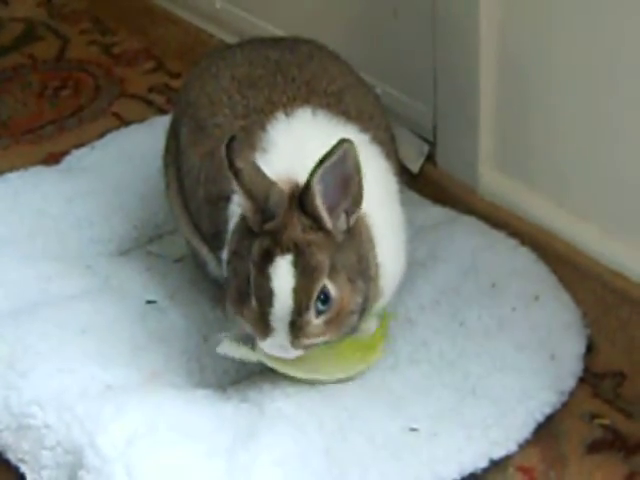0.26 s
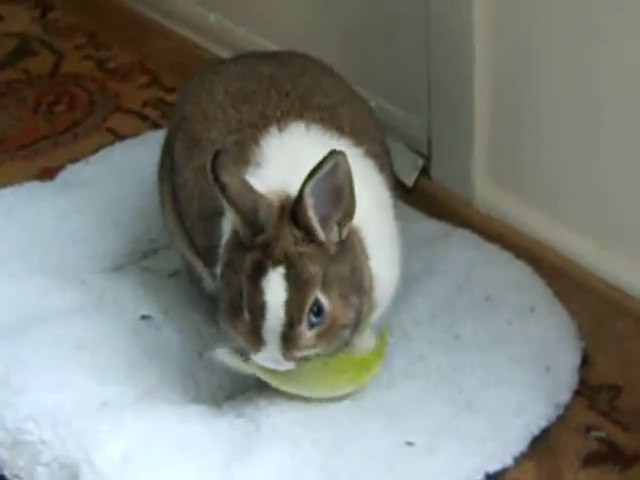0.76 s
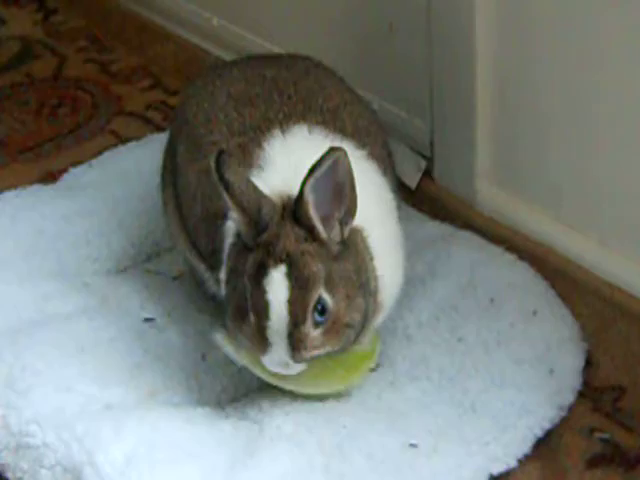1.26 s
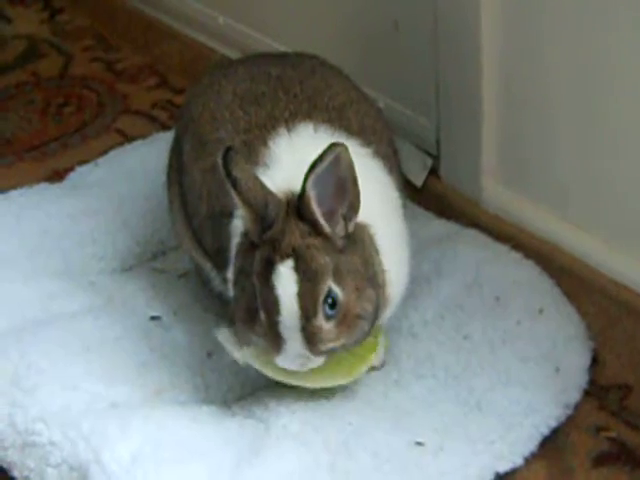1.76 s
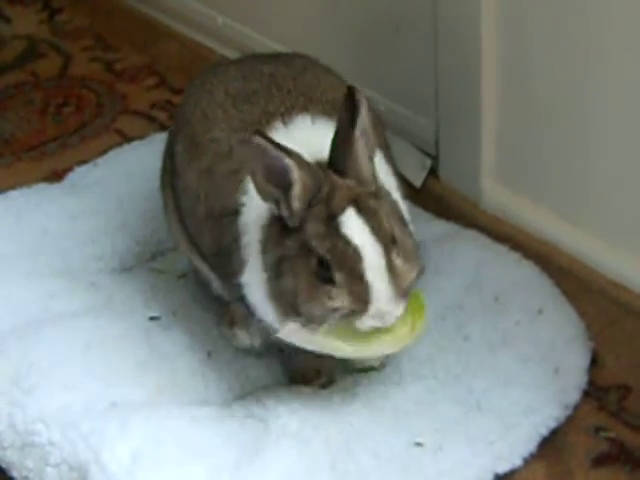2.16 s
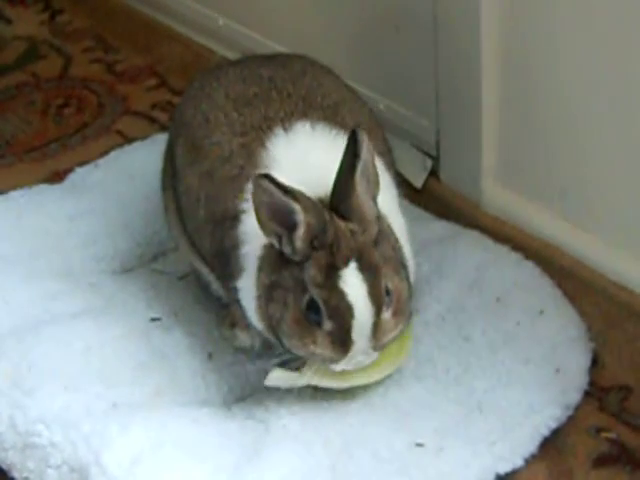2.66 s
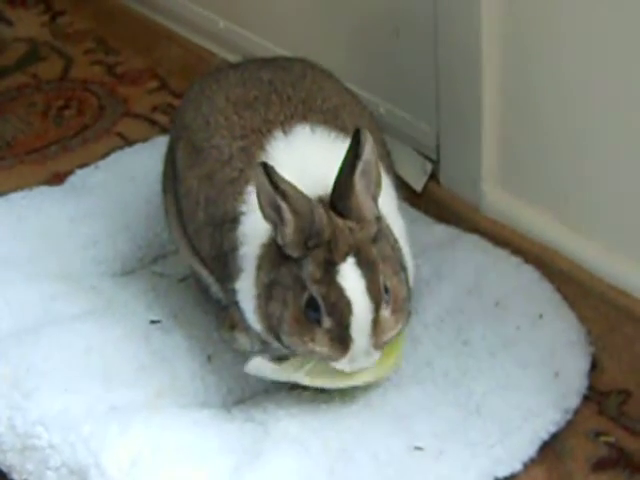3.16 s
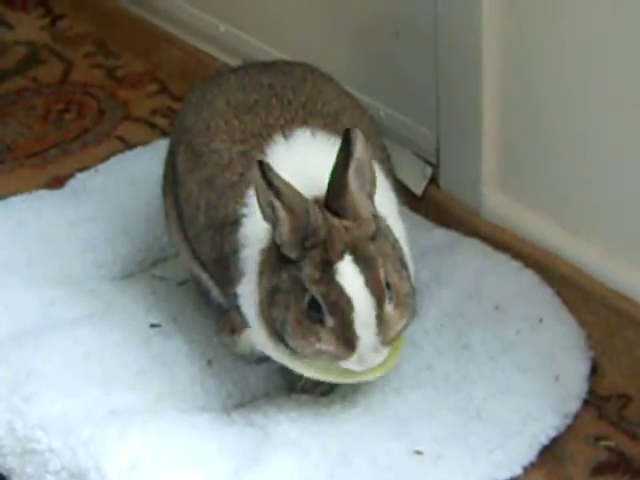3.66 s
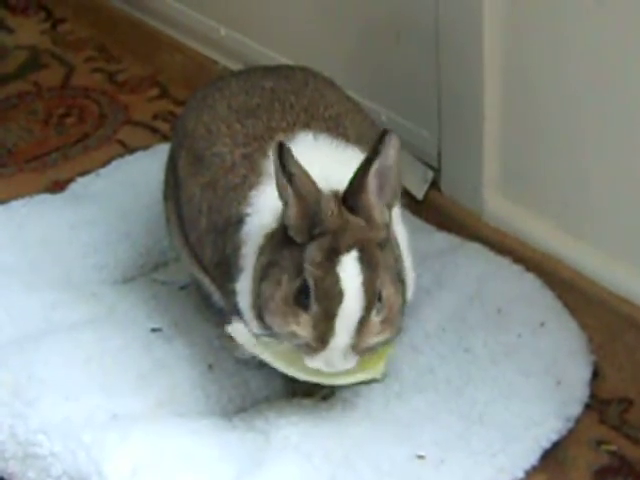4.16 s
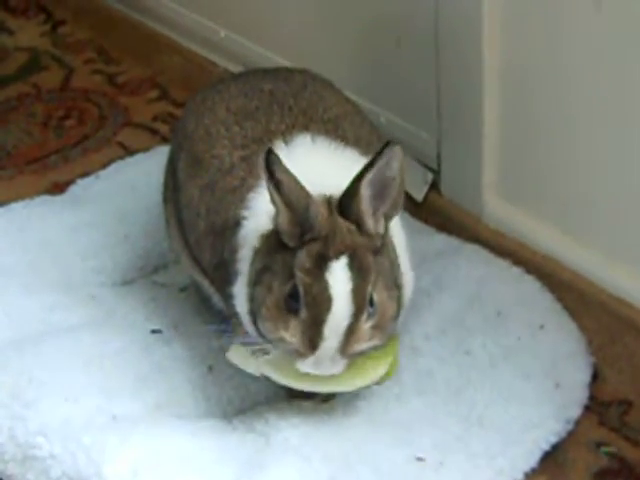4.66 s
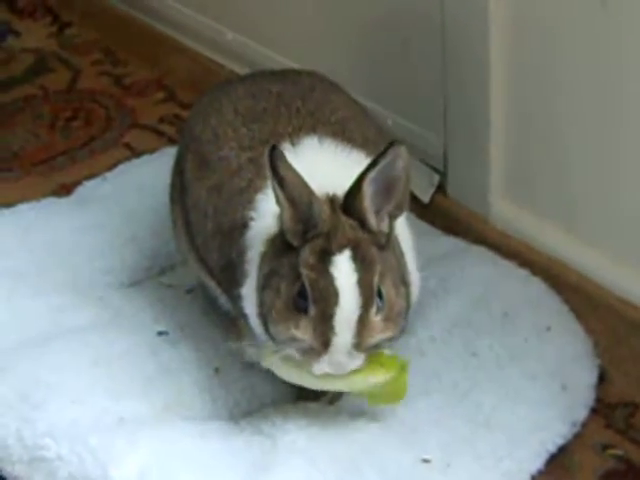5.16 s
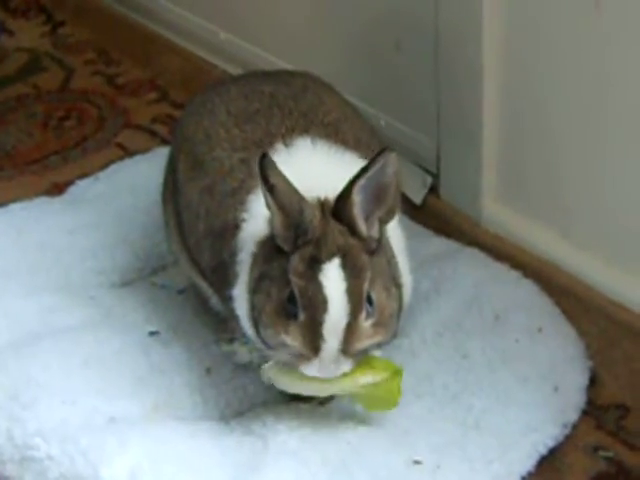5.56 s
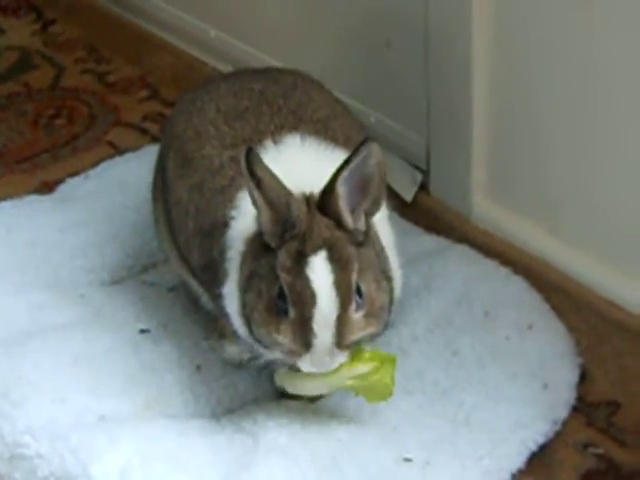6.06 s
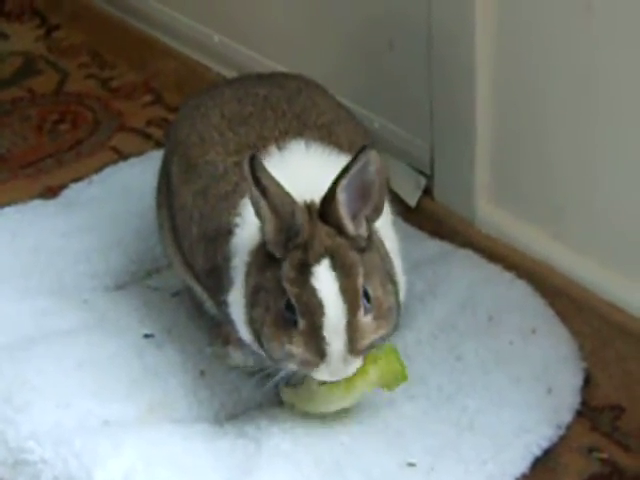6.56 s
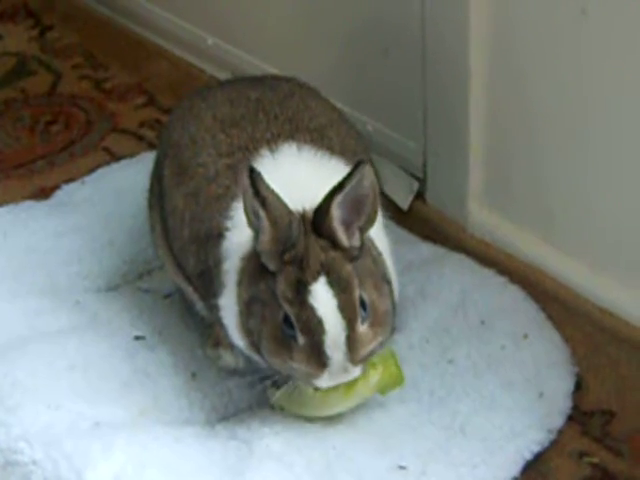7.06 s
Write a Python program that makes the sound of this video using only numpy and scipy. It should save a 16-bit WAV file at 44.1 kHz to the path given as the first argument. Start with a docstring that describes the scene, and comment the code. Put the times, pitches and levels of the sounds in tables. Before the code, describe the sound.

A rabbit eats a lettuce leaf close to the microphone in a small quiet room. Steady appliance hum, low rumble and hiss run throughout, with a muffled low drone that swells unevenly and fades after about 5 seconds. One small crisp snap comes right at the start and another at about 1.4 seconds, followed by soft crackly chews. From 2 to 4.5 seconds the leaf breaks in irregular clusters of tiny, bright snaps. The teeth add a few hollow knocks, clearest at about 4.1 and 4.9 seconds. Just after 5 seconds the chewing pauses, and an appliance motor takes up load, its low hum growing slightly louder with a faint thin whine. A last quick cluster of crunches comes between 6.1 and 6.4 seconds, then only hum and hiss remain until the end, at about 7.5 seconds.

```python
"""A quiet room: appliances hum over a low rumble and microphone hiss, and a muffled drone swells and fades.
Close by, a rabbit on a fleece blanket bites a lettuce leaf. Its crisp cells burst in soft chews and
small irregular clusters of snaps, each ringing the leaf and the jaw; meeting teeth add hollow knocks.
Near the end an appliance motor takes up load and whines."""
import sys
import numpy as np
from scipy import signal
from scipy.fft import rfft, irfft, next_fast_len
from scipy.io import wavfile
from scipy.ndimage import uniform_filter1d, map_coordinates

SR = 44100
rng = np.random.default_rng(int(sys.argv[2]) if len(sys.argv) > 2 else 0)


def bounce(signal):
    """Save signal as a 16-bit WAV file at the path given by the first command-line argument."""
    frames = np.transpose(np.atleast_2d(signal))
    limited = np.clip(frames, -1, 1)
    pcm = np.round(limited * 32767).astype(np.int16)
    wavfile.write(sys.argv[1], SR, pcm)


N = 322747
TIME_S = np.arange(N) / SR


def amp(db):
    """Decibels to gain."""
    return 10 ** (np.asarray(db) / 20)


def unit(x):
    """x at rms 1."""
    return x / np.sqrt(np.mean(x ** 2) + 1e-20)


def along(points, hz):
    """A (freq_hz, value) curve read on a log frequency axis."""
    freqs, values = np.transpose(points)
    return np.interp(np.log(hz + 1), np.log(freqs + 1), values)


def fader(points):
    """Gain per sample, riding through (time_s, level_db) points."""
    times, levels = np.transpose(points)
    return amp(np.interp(TIME_S, times, levels))


def wobble(rate):
    """A smooth random curve, rate knots a second."""
    return map_coordinates(rng.standard_normal(int(N * rate / SR) + 4), [TIME_S * rate])


def filtered(x, response):
    """x through an EQ whose gain is response(hz)."""
    size = next_fast_len(N + SR // 2)
    return irfft(rfft(x, size) * response(np.fft.rfftfreq(size, 1 / SR)), size)[:N]


def noise(spectrum):
    """Noise of rms 1 with the given colour."""
    return unit(filtered(rng.standard_normal(N), lambda hz: amp(along(spectrum, hz))))


def tone(hz, waver):
    """A sine of rms 1 whose strength and phase waver."""
    phase = 2 * np.pi * (hz * TIME_S + rng.random())
    return unit((1 + waver * wobble(7)) * np.sin(phase) + waver * wobble(7.6) * np.cos(phase))


def ring(hz, wake_s, grit, cycles=9):
    """A damped resonance, struck by one fracture and the tiny ones in its wake."""
    t = np.arange(SR // 20) / SR
    wake = grit * rng.standard_normal(len(t)) * amp(-60 * t / wake_s)
    wake[0] = 1
    turns = hz * t  # wet tissue builds up within a cycle and rings for only a few more
    mode = np.sin(2 * np.pi * turns) * (1 - np.exp(-turns / 0.72)) ** 2 * amp(-60 * turns / cycles)
    struck = signal.fftconvolve(wake, mode)[:len(t)]
    return struck * np.sqrt(0.004 * SR / np.sum(struck ** 2))  # the energy of 4 ms at rms 1


# Colour of the room's rumble: freq_hz, relative_db
RUMBLE_SPECTRUM = [(12, -30), (25, -6), (40, -0.5), (70, -3.5), (130, 0), (200, -4.5), (275, -5.5),
                   (310, -4), (350, -7.5), (800, -9.5), (1500, -13.5), (4000, -27)]
# Colour of the microphone's hiss: freq_hz, relative_db
HISS_SPECTRUM = [(200, -8.5), (1300, -0.5), (2300, 2), (2900, 1.5), (3400, 1), (4000, -0.5), (4700, .5),
                 (5400, -1), (6100, -1), (7200, -2), (9000, -5)]

def noise_bed():
    """Room rumble under microphone hiss, both drifting slightly in level."""
    rumble = amp(-40.5 + 0.4 * wobble(5)) * noise(RUMBLE_SPECTRUM)
    hiss = amp(-42.5 + 0.25 * wobble(2.7)) * noise(HISS_SPECTRUM)
    return rumble + hiss


# Partials of the appliance hum: pitch_hz, level_db
HUM_PARTIALS = [(58.7, -45.5), (108.7, -45), (119.8, -56.5), (149, -57), (736, -64.5), (827.5, -59.5)]

def appliance_hum():
    """Appliances hold a steady chord with one fuzzy, wavering overtone."""
    steady = sum(amp(db) * tone(hz, waver=0.093) for hz, db in HUM_PARTIALS)
    return steady + amp(-58.5) * tone(307.8, waver=1.4)


def motor(pitch_hz=91.2, load_start_s=5.1, load_rise_s=0.2, creep_db_per_s=1.55):
    """An appliance motor idles unevenly, then takes up load, steadies, grows louder and whines."""
    loaded_s = TIME_S - load_start_s
    load = np.clip(loaded_s / load_rise_s, 0, 1)
    idling = amp(-49.5) * tone(pitch_hz, waver=0.35)
    working = amp(-44 + creep_db_per_s * loaded_s) * tone(pitch_hz, waver=0.12)
    whine = amp(-60) * tone(1070, waver=0.1)
    return (1 - load) * idling + load * (working + whine)


# Partials of the drone's low voice: pitch_hz, relative_db, waver_depth
LOW_PARTIALS = [(166, -0.5, 0), (124.6, -6.5, 0.5), (187.8, -11.5, 0.5)]
# Fader rides for the drone's three voices, ahead of the fade-out: time_s, level_db
LOW_SWELLS = [(0.0, -53), (0.13, -42), (0.44, -60), (0.48, -44.5), (1.62, -42.5), (1.76, -48), (1.84, -71),
              (1.92, -47.5), (2.52, -41), (2.59, -52), (2.78, -38), (3.48, -52), (3.72, -45.5),
              (4.4, -53.5)]
MIDDLE_SWELLS = [(0.0, -43), (0.79, -45), (1.63, -36), (2.0, -42), (2.59, -39.5), (2.76, -53.5),
                 (3.36, -37), (4.25, -53.5), (4.29, -46.5), (5.0, -55)]
HIGH_SWELLS = [(0.0, -57), (0.24, -54), (0.41, -47), (0.81, -54), (0.92, -42), (1.22, -44), (1.29, -53),
               (1.92, -52.5), (2.35, -40.5), (2.42, -54), (2.91, -44), (3.31, -65), (3.81, -52), (4.2, -58)]

def drone(fade_start_s=4.9, fade_db_per_s=1.5):
    """Low tones from beyond the walls swell in turn, beat and fade."""
    low = sum(amp(db) * tone(hz, waver) for hz, db, waver in LOW_PARTIALS)
    high = tone(248, waver=0.12) + amp(-18.5) * tone(311, waver=0.71)
    middle = amp(-0.5) * tone(205.2, waver=0.12)
    fade = amp(-fade_db_per_s * np.maximum(TIME_S - fade_start_s, 0))
    return fade * (fader(LOW_SWELLS) * low + fader(MIDDLE_SWELLS) * middle + fader(HIGH_SWELLS) * high)


# Soft chews, each a patch of faint crackle: start_s, length_s, level_db
CHEW_PATCHES = [(0.096, 0.018, -44), (1.518, 0.023, -40.5), (1.792, 0.042, -41.5), (1.998, .02, -45),
                (2.23, 0.11, -44), (2.451, 0.014, -40), (3.309, 0.04, -47), (3.92, .02, -43),
                (4.459, .06, -48), (5.054, 0.019, -41.5), (6.351, .035, -46)]

def soft_chews(cells_per_s=450):
    """While the teeth press the leaf, its cells burst at random moments."""
    out = np.zeros(N + SR)
    cell = ring(3970, wake_s=0.0037, grit=0.13) + amp(-1) * ring(6000, wake_s=0.004, grit=0.1)
    for start_s, length_s, db in CHEW_PATCHES:
        moments, sizes = rng.random((2, 64))
        count = int(np.clip(length_s * cells_per_s, 1, len(moments)))
        for moment, size in zip(moments[:count], sizes[:count]):
            out[round((start_s + moment * length_s) * SR):][:len(cell)] += amp(db) * size * cell
    return out[:N]


# Clear snaps of the leaf: start_s, pitch_hz, level_db, crisp_relative_db
LEAF_SNAPS = [(0.116, 4000, -28.5, -3.5), (1.3719, 4200, -31, 0), (2.0612, 3900, -41.5, 12.5),
              (2.0672, 3720, -41.5, 10.5), (2.0716, 3360, -24.5, -13), (2.075, 3410, -38, 5),
              (2.254, 4170, -38, -4), (2.2875, 4330, -35.5, -7), (2.327, 4430, -35.5, -4),
              (2.47, 4050, -25.5, -2.5), (2.507, 4100, -39.5, 0), (2.8387, 4400, -40, 6),
              (2.8454, 4520, -32, 1.5), (2.874, 4190, -35, -6), (2.8967, 3370, -39, -1),
              (3.3162, 2820, -35, -10), (3.4378, 2840, -35.5, -5), (3.7014, 4530, -36, -1),
              (3.7104, 3350, -28.5, -4), (3.7467, 3540, -29.5, -4.5), (3.8187, 2780, -33.5, -7),
              (3.903, 3000, -35.5, -7), (3.9368, 3970, -34, -4), (4.1346, 2710, -28, -8),
              (4.1666, 3060, -32.5, -1.5), (4.2935, 3770, -34, -6), (4.3044, 3600, -34, 2),
              (4.4858, 3210, -41.5, 1), (4.9179, 3940, -29.5, -10), (5.0758, 3550, -36.5, -6),
              (6.13, 4500, -30, -9), (6.1359, 4570, -42, 1), (6.2743, 4400, -29, -4),
              (6.292, 3540, -28.5, -11), (6.2976, 3580, -31, 2), (6.299, 3430, -33, 0),
              (6.3034, 3550, -29.5, -4), (6.3175, 3710, -46.5, 11), (6.338, 3650, -39, 3)]

def leaf_snaps(jaw_hz, crisp_hz=6200, wake_s=0.011):
    """Each fracture rings two modes of the leaf, cracks brightly on top and faintly stirs the jaw."""
    out = np.zeros(N + SR)
    for start_s, pitch_hz, db, crisp_db in LEAF_SNAPS:
        jaw_detune, crisp_detune = np.exp(0.052 * rng.standard_normal(2))
        jaw = amp(-16.5) * ring(jaw_hz * jaw_detune, wake_s, grit=0.05, cycles=8)
        leaf = ring(pitch_hz, wake_s, grit=0.13, cycles=8.6)
        overtone = amp(-9.5) * ring(1.5 * pitch_hz, wake_s, grit=0.23, cycles=7)
        crisp = amp(crisp_db) * ring(crisp_hz * crisp_detune, wake_s, grit=0.28, cycles=7.5)
        out[round(start_s * SR):][:len(leaf)] += amp(db) * (jaw + leaf + overtone + crisp)
    return out[:N]


def crackle(cells_per_s=110, level_db=-51.5):
    """Single cells give way faintly around each snap, up to twice as thickly where snaps crowd."""
    onsets = np.zeros(N)
    onsets[(np.array(LEAF_SNAPS)[:, 0] * SR).astype(int)] = 1
    strain = np.minimum(uniform_filter1d(onsets, size=2200) * 2200, 2)  # snaps within 25 ms either side
    bursts = (rng.random(N) < strain * cells_per_s / SR) * rng.standard_normal(N)
    cell = ring(3440, wake_s=0.0069, grit=0.1) + ring(5770, wake_s=0.006, grit=0.11)
    return amp(level_db) * signal.fftconvolve(bursts, cell)[:N]


# Hollow knocks where the teeth meet: start_s, level_db
TOOTH_KNOCKS = [(2.8967, -39), (3.8187, -38), (3.9033, -39), (4.1354, -26.5), (4.9172, -33.5),
                (6.2974, -41)]

def tooth_knocks(jaw_hz, skull_hz=710, wake_s=0.018):
    """Meeting teeth ring the jaw hard, with a lower skull mode underneath."""
    out = np.zeros(N + SR)
    for start_s, db in TOOTH_KNOCKS:
        jaw = ring(jaw_hz, wake_s, grit=0.054, cycles=19)
        skull = amp(-13) * ring(skull_hz, wake_s, grit=0.03, cycles=12)
        out[round(start_s * SR):][:len(jaw)] += amp(db) * (jaw + skull)
    return out[:N]


# Reverb time of the room: freq_hz, t60_s
ROOM_DECAY = [(200, 0.2), (2000, 0.048), (8000, 0.13)]

def room_reverb(x):
    """The small room's short tail, 3 ms behind the sound; the mids die first."""
    hz, t, spectrum = signal.stft(rng.standard_normal(SR // 3), SR, nperseg=256)
    decay = amp(-60 * t / along(ROOM_DECAY, hz)[:, None])
    tail = signal.istft(spectrum * decay, SR, nperseg=256)[1]
    return signal.fftconvolve(x, np.pad(tail / np.linalg.norm(tail), (130, 0)))[:N]


def scene():
    """The rabbit close by, over the hum and hiss of the room, in mono."""
    jaw_hz = 1330
    chewing = leaf_snaps(jaw_hz) + tooth_knocks(jaw_hz) + soft_chews() + crackle()
    bed = noise_bed()
    reverb = amp(-13.5) * room_reverb(chewing)
    return (chewing + reverb + bed + drone() + appliance_hum() + motor())[None]


# The recorder's treble roll-off: freq_hz, gain_db
TREBLE_ROLLOFF = [(7200, 0.5), (7650, -3), (8000, -16.5), (8450, -12.5), (8850, -25.5), (9150, -49)]
BAND_LIMIT_HZ = 9200

def record(dry):
    """The recorder rolls off the treble and keeps nothing above its band limit."""
    return filtered(dry[0], lambda hz: amp(along(TREBLE_ROLLOFF, hz)) * (hz < BAND_LIMIT_HZ))[None]


dry = scene()
out = record(dry)
bounce(out)
```